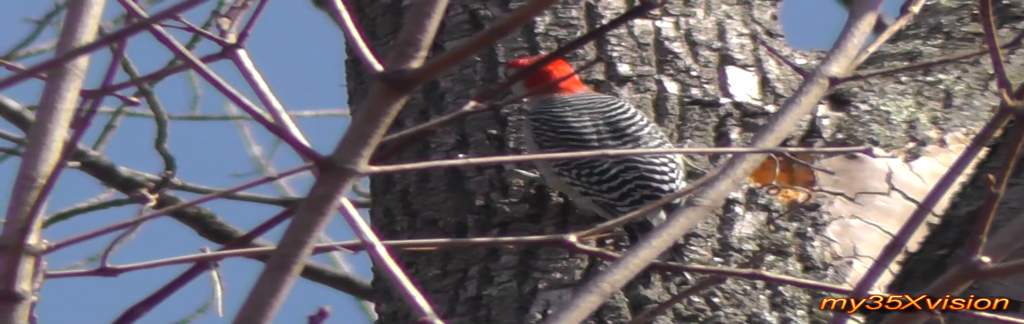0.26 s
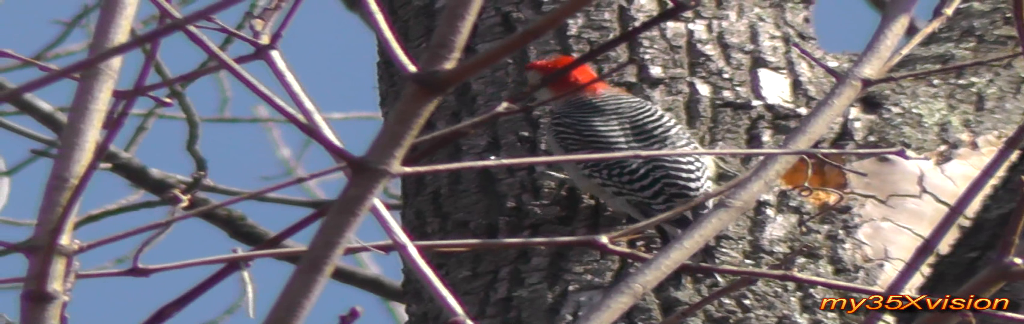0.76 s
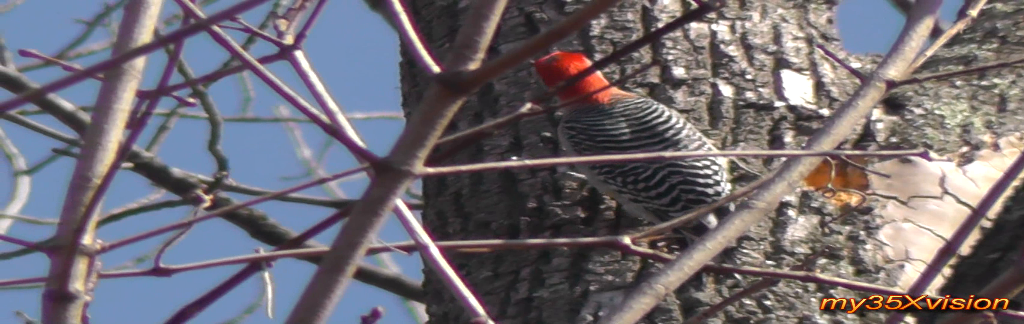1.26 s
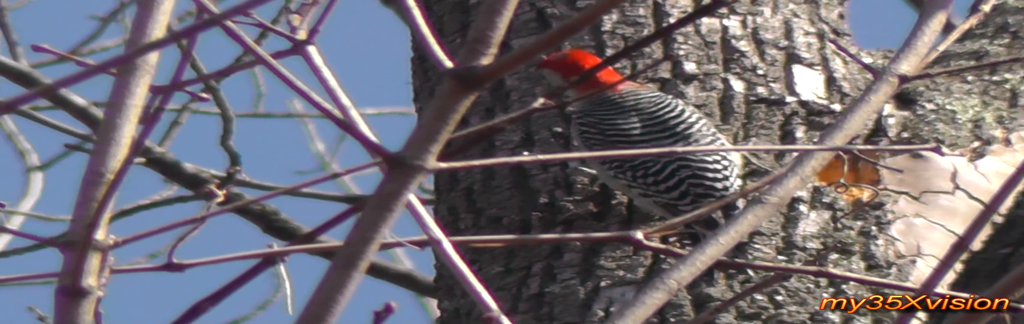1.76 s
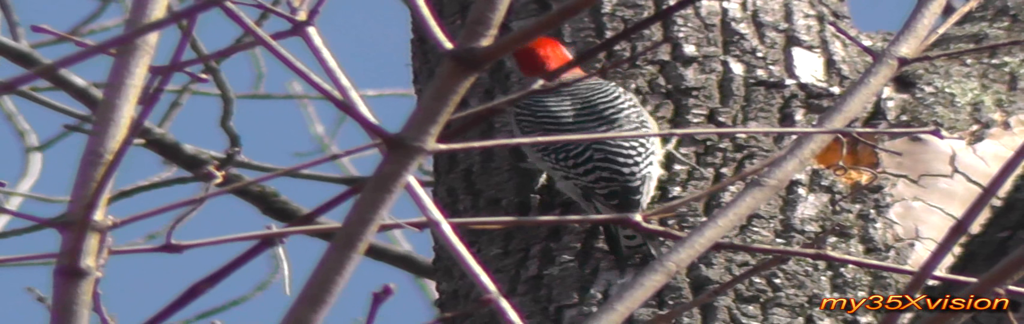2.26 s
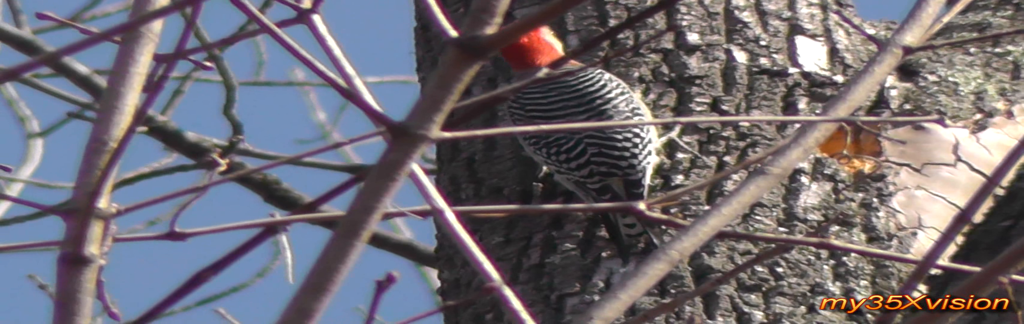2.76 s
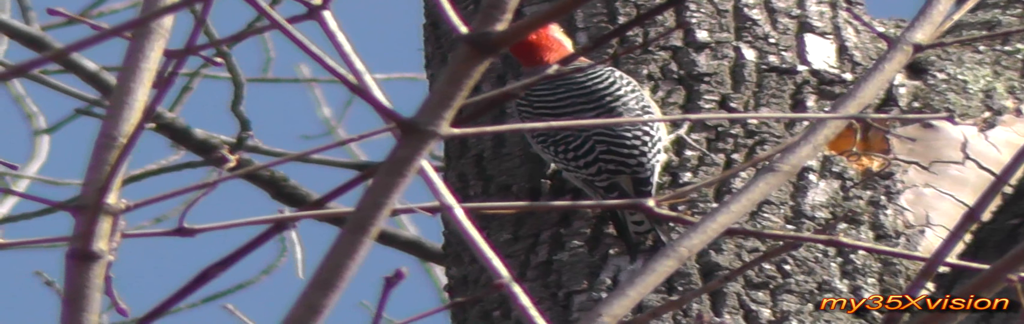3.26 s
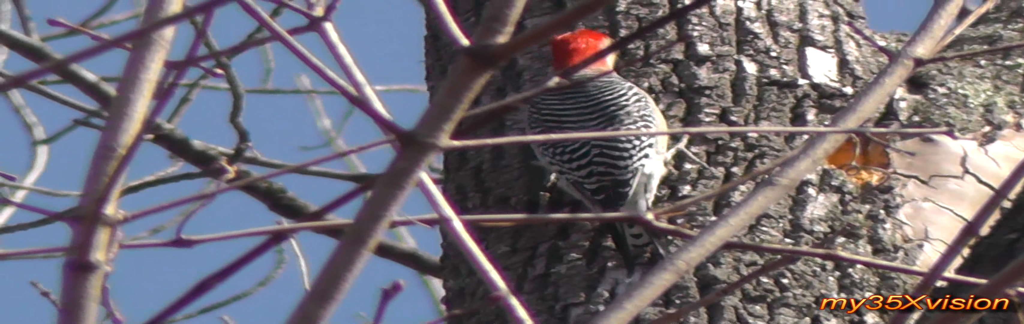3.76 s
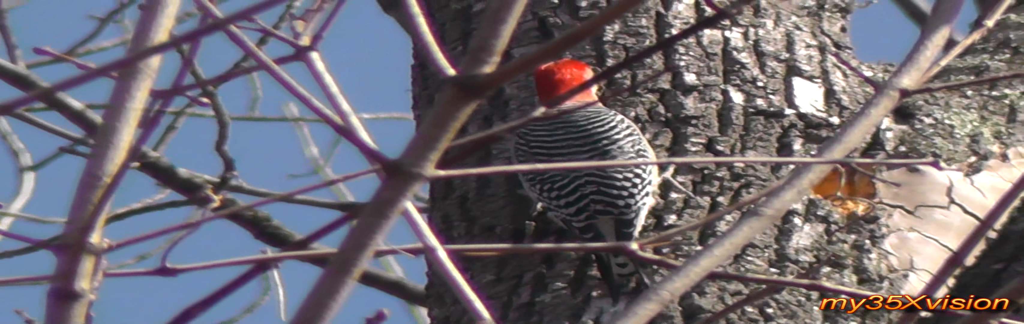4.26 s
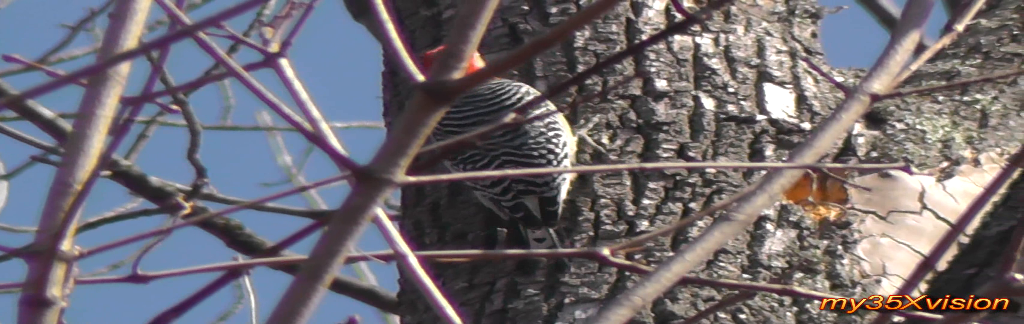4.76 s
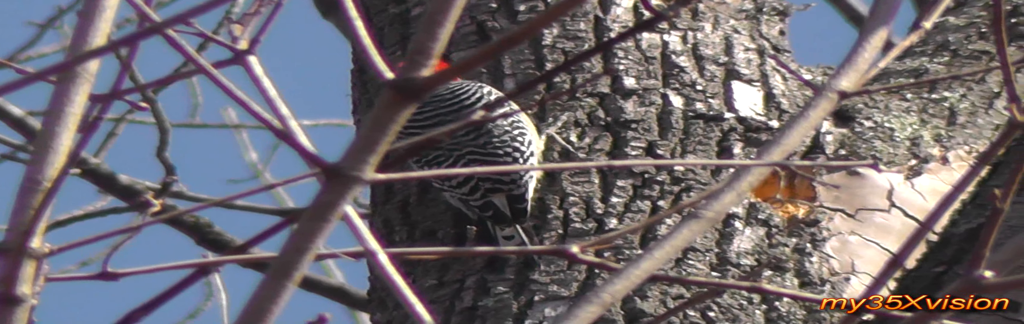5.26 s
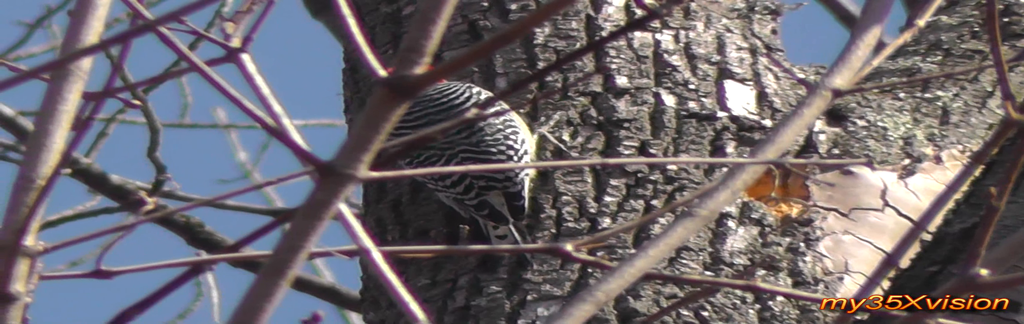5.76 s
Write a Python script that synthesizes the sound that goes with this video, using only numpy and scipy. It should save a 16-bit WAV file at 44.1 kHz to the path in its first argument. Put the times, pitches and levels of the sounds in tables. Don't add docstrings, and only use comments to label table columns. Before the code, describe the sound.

Four brief churring woodpecker calls ring among park trees with long gaps, above a soft far-off road rumble, unsteady hum and tiny twig ticks.

```python
import sys
import numpy as np
from scipy import signal
from scipy.fft import rfft, irfft, next_fast_len
from scipy.io import wavfile
from scipy.ndimage import uniform_filter1d, map_coordinates

SR = 44100
rng = np.random.default_rng(int(sys.argv[2]) if len(sys.argv) > 2 else 0)


def unload_wav(signal):
    wavfile.write(
        sys.argv[1],
        SR,
        np.round(np.clip(np.atleast_2d(signal).T, -1, 1) * 32767).astype(np.int16),
    )


def makeup_ratio(level_db):
    decades = np.asarray(level_db, float) / 20
    return 10 ** decades


N = 264820
TOP_HZ = 15770


def unit(x):
    return x / np.sqrt(np.mean(x ** 2) + 1e-20)


def along(points, hz):
    f, v = np.transpose(points)
    return np.interp(np.log(hz + 1), np.log(f + 1), v)


def wobble(rate, size):
    knots = rng.standard_normal(int(size * rate / SR) + 4)
    return map_coordinates(knots, [np.arange(size) * rate / SR])


def filtered(x, response):
    size = next_fast_len(x.shape[-1] + 8192)
    spectrum = rfft(x, size) * response(np.fft.rfftfreq(size, 1 / SR))
    return irfft(spectrum, size)[..., :x.shape[-1]]


def causal(points):
    def response(hz):
        cepstrum = irfft(np.log(makeup_ratio(along(points, hz)) + 1e-6))
        half = len(cepstrum) // 2
        cepstrum[1:half] *= 2
        cepstrum[half + 1:] = 0
        return np.exp(rfft(cepstrum))
    return response


# (frequency [Hz], likeness [0 to 1])
LIKENESS = [(30, 1), (60, 0.98), (130, 1.0), (290, .98), (640, 0.77), (1410, 0.65), (3100, 0.92),
            (4500, 0.87), (6820, 0.89), (15000, 0.18)]


def rush(spectrum, patchy_db):
    noise = signal.stft(rng.standard_normal((2, N)), nperseg=512)[2]
    patches = uniform_filter1d(rng.standard_normal(noise.shape[1:]), size=6, axis=0)
    patches = uniform_filter1d(patches, size=14, axis=1)
    pair = signal.istft(noise * makeup_ratio(patchy_db * unit(patches)), nperseg=512)[1][:, :N]

    def colour_and_width(hz):
        angle = np.arccos(np.clip(along(LIKENESS, hz), -1, 1)) / 2
        return makeup_ratio(along(spectrum, hz)) * [np.cos(angle), np.sin(angle)]

    mid, side = filtered(pair, colour_and_width)
    return unit(np.array([mid + side, mid - side]))


# (frequency [Hz], level [dB])
RUMBLE_COLOUR = [(13, -67), (26, -33), (40, -16), (50, -20), (67, -5), (118, -3), (146, -2.5), (177, 0),
                 (227, -1), (261, -11.5), (295, -2.5), (323, -13), (808, -18), (1500, -27), (1950, -48),
                 (3300, -120)]


def traffic():
    t = np.arange(N) / SR
    level_db = -38 + 0.18 * t + 0.17 * wobble(2.94, N)
    return makeup_ratio(level_db) * rush(RUMBLE_COLOUR, patchy_db=0.45)


# (frequency [Hz], level [dB])
HISS_COLOUR = [(880, -8.5), (1500, -24), (1610, -2), (2120, -12), (2520, 0), (2680, 2), (3070, -3),
               (3890, -20.5), (4380, -18), (5220, -12), (5600, -13), (6680, -5), (7370, -18), (15200, -21),
               (15700, -25)]


def camera_hiss():
    return makeup_ratio(-57.5 + 3.0) * rush(HISS_COLOUR, patchy_db=1.5)


# (frequency [Hz], pitch wander [Hz], level [dB])
MOTOR_TONES = [(178, 8.05, -46), (295.4, 5.14, -57)]


def motor():
    hum = np.zeros(N)
    for hz, wander_hz, db in MOTOR_TONES:
        gain = makeup_ratio(db + 2.16 * wobble(9, N)) * np.sqrt(2)
        phase = 2 * np.pi * np.cumsum(hz + wander_hz * wobble(15, N)) / SR
        hum += gain * np.sin(phase)
    return hum


# (time [s], peak level [dB], ring frequency [Hz])
TWIG_TICKS = [
    (3.5555, -34, 3220),
    (3.591, -44, 6000),
    (3.5927, -41, 2800),
    (5.3976, -39, 6050),
    (5.399, -43, 3000),
]


def twigs():
    out, t = np.zeros(N + SR), np.arange(SR // 20) / SR
    for start, db, hz in TWIG_TICKS:
        ring = np.sin(2 * np.pi * hz * t) * makeup_ratio(-60 * t / 0.0064)
        crackle = 0.99 * rng.standard_normal(len(t)) * makeup_ratio(-60 * t / 0.01)
        soft_start = 1 - np.exp(-t / 0.00044)
        out[round(start * SR):][:len(t)] += makeup_ratio(db) * (ring + crackle) * soft_start
    return filtered(out[:N], causal([(1200, -39), (2600, 7.5), (8000, 2.5), (11000, -12), (16000, -18)]))


# (frequency [Hz], time to fall by 60 dB [s])
TREE_DECAY = [(800, 0.97), (2000, 1), (7000, 0.99), (10000, 0.69)]
# (delay [s], level [dB])
TRUNK_ECHOES = [(.0025, -18), (.008, -11), (.014, -12.5), (.023, -19)]


def trees(x):
    hz, t, noise = signal.stft(rng.standard_normal((2, SR)), SR, nperseg=256)
    slow_decay = makeup_ratio(-60 * t / along(TREE_DECAY, hz)[:, None])
    fast_decay = 0.88 * makeup_ratio(-60 * t / 0.21)
    tail = signal.istft(noise * (slow_decay + fast_decay), SR, nperseg=256)[1]
    tail += 0.97 * tail.mean(axis=0)
    tail = makeup_ratio(-12.0) * tail / np.linalg.norm(tail[0])
    for delay, db in TRUNK_ECHOES:
        tail[0, round(delay * SR)] += makeup_ratio(db)
        tail[1, round(delay * SR) + rng.integers(-2, 3)] += makeup_ratio(db)
    return signal.fftconvolve(x[None], tail, axes=1)[:, :len(x)]


# (frequency [Hz], level [dB])
BEAK_COLOUR = [(1470, -41), (2500, -3.5), (3600, -3), (4250, -14.5), (4580, -6), (5600, -7), (7200, -2),
               (7660, -5.5), (8250, -23), (10300, -43.5), (13400, -72), (22000, -120)]


def facing(lobes):
    hz = np.geomspace(BEAK_COLOUR[0][0], BEAK_COLOUR[-1][0], 300)
    peaks_db = sum(db * np.exp(-((hz - centre) / width) ** 2) for centre, width, db in lobes)
    return np.transpose([hz, along(BEAK_COLOUR, hz) + peaks_db])


LEAP_S, LAST_LONGER_S = .0285, 0.00506
BEAK_OPENS_S, BEAK_SHUTS_S, SHUT_DB = 0.026, 0.022, -11.5
TIRES_DB_PER_S, ONSET_BRIGHT_DB = -11, -1.5
TURN_S = 0.098


def beak_opening(start, leaps, beak_db, bright_db, turn_db, t):
    end = leaps[-1, 0] + LEAP_S + LAST_LONGER_S
    opening = 1 - (t - start) / BEAK_OPENS_S
    shutting = 1 - (end - t) / BEAK_SHUTS_S
    shut = np.clip(np.maximum(opening, shutting), 0, 1)
    tired_db = TIRES_DB_PER_S * (t - (start + end) / 2)
    lower_db = beak_db + tired_db + SHUT_DB * shut - 120 * (t > end)
    upper_db = lower_db + bright_db + ONSET_BRIGHT_DB * (t < leaps[0, 0])
    turned_db = turn_db * np.clip(2 * (1 - (end - t) / TURN_S), 0, 1)
    return uniform_filter1d(makeup_ratio(np.array([lower_db, upper_db, turned_db])), size=200, axis=1)


REST_HZ, PEAK_HZ, FIRST_SHORT_HZ = 1040.4, 1907, 150
FULL_DB, SAG_HZ_PER_DB, SAG_MOST_HZ = -31, 130, 398
SECOND_HZ, SECOND_SCATTER, PEAK_SCATTER = 1361, 0.059, 0.01938
HOARSE, FIRST_HOARSE, HOARSE_SCATTER = .63, .4, .1
KICK_DB = 3.5


def syrinx_controls(onset, leaps, t):
    onset_s, onset_hz, onset_db = np.transpose(onset)
    pitch = np.interp(t, onset_s, onset_hz)
    level = np.interp(t, onset_s, onset_db, left=-120)
    second, hoarse = pitch.copy(), np.zeros(len(t))
    chance = rng.standard_normal((len(leaps), 3))
    for k, ((start, leap_db), (top_luck, second_luck, rough_luck)) in enumerate(zip(leaps, chance)):
        last = k == len(leaps) - 1
        end = start + LEAP_S + LAST_LONGER_S * last
        lower = SECOND_HZ * (1 + SECOND_SCATTER * second_luck)
        sag = np.clip(SAG_HZ_PER_DB * (FULL_DB - leap_db), 0, SAG_MOST_HZ) + FIRST_SHORT_HZ * (k == 0)
        top = PEAK_HZ * (1 + PEAK_SCATTER * top_luck) - sag
        rough = (HOARSE if k and not last else FIRST_HOARSE) + HOARSE_SCATTER * rough_luck
        u = np.clip((t - start) / (end - start), 0, 1)
        arch = np.abs(np.sin(np.pi * np.clip(1.09 * u, 0, 1) ** 1.05)) ** .68
        now = t > start - .003
        rest = REST_HZ - 3000 * np.clip(t - end, 0, .02)
        pitch[now] = (rest + (top - rest) * arch)[now]
        second[now] = np.minimum(pitch, lower * (.94 + 0.101 * u))[now]
        level[now] = (leap_db - 0.9 - 1.9 * (1 - arch) + KICK_DB * (.5 - u))[now]
        level -= min(6 * k, 18) * np.exp(-((t - start + 0.0025) / 0.0021) ** 2)
        hoarse[now] = np.clip(rough, 0, 1) * (0.23 + 0.91 * arch ** 3)[now]
    level -= 2600 * np.clip(t - end + 0.00075, 0, 1)
    return uniform_filter1d(np.array([pitch, second, level, hoarse]), size=90, axis=1)


# (frequency [Hz], level [dB])
THROAT_COLOUR = [(500, -64), (800, -8.5), (930, -1), (1050, -1), (1170, -1.5), (1330, 3), (1430, 3),
                 (1570, 3), (1670, -6.5), (1870, 0.5), (2100, -9.5), (2330, -22.5), (2600, -48)]
TURN_HZ, TURN_WIDTH_HZ = 5500, 490
GAP_HZ, GAP_WIDTH_HZ, GAP_DB = 3730, 580, -6


def call(onset, leaps, head, beak, size):
    t = onset[0][0] + np.arange(size) / SR
    pitch, second, level, hoarse = syrinx_controls(onset, leaps, t)

    def voice_phase(hz):
        waver = 1 + (.003 + .075 * hoarse) * wobble(450, size)
        return 2 * np.pi * np.cumsum(hz * waver) / SR

    phase = voice_phase(pitch)
    behind = voice_phase(second)
    pulses = sum(np.cos(k * phase) * (k * pitch < TOP_HZ) for k in range(1, 18))
    pulses *= 1 - .4 * hoarse + 1.1 * hoarse * np.cos(phase - behind)
    pulses += .15 * hoarse * np.cos(behind)
    strain = uniform_filter1d(hoarse, size=1500)
    leak = (.1 + 3.5 * strain) * rng.standard_normal(size) * (1 + np.cos(phase))
    flutter_db = 1.6 * wobble(200, size)
    low = filtered(makeup_ratio(level + flutter_db + 5.5) * (pulses + 0.22 * leak), causal(THROAT_COLOUR))

    high = pulses + filtered(leak, lambda hz: .5 + .5 / (1 + (4300 / (hz + 1)) ** 6))
    high = filtered(high, lambda hz: causal(head)(hz) / (1 + (hz / 11500) ** 16))
    lobe = filtered(high, lambda hz: np.exp(-((hz - TURN_HZ) / TURN_WIDTH_HZ) ** 2))
    gap = filtered(high, lambda hz: np.exp(-((hz - GAP_HZ) / GAP_WIDTH_HZ) ** 2))
    in_trill = np.clip((t - leaps[0, 0]) / .006, 0, 1)
    high = high + (makeup_ratio(GAP_DB) - 1) * in_trill * gap
    upper = filtered(high, lambda hz: 1 / (1 + (6000 / (hz + 1)) ** 12))
    lower_gain, upper_gain, turned = beak_opening(t[0], leaps, *beak, t)
    lower = high - upper + (turned - 1) * lobe
    return low + makeup_ratio(2.5) * lower_gain * lower + makeup_ratio(2.0) * upper_gain * upper


# (time [s], onset level [dB], beak opening [dB], brightness above 6 kHz [dB],
# gain as the head turns to the camera [dB])
CALLS = [
    (-.034, -43, -49, 2.5, 7),
    (1.016, -42, -47, 2.5, 0),
    (2.157, -41.5, -44.5, -3, 9),
    (3.934, -41.5, -44, 1.5, 5.5),
]
# (time after start [s], pitch [Hz], level [dB])
CLEAR_ONSET = [
    (0, 618, -14),
    (.005, 688, -1.5),
    (.015, 852, 5.5),
    (.023, 973, 3),
    (.029, 1010, 2),
    (.044, 908, 1),
    (.052, 989, 4.5),
]
# (time [s], level [dB])
TRILL_LEAPS = [(.022, -32.5), (.057, -29.5), (.099, -29), (.139, -28.5), (.178, -28), (.216, -30.5),
               (.25, -31.5), (1.072, -29.5), (1.103, -28), (1.143, -28.5), (1.182, -28), (1.219, -27.5),
               (1.255, -28.5), (1.295, -30.5), (1.326, -33.5), (2.208, -30), (2.244, -27.5), (2.281, -28),
               (2.318, -29.5), (2.356, -29), (2.395, -32.5), (2.432, -32), (2.471, -39), (3.989, -29.5),
               (4.022, -28.5), (4.061, -29), (4.101, -27.5), (4.14, -29.5), (4.176, -28), (4.215, -32.5)]
# (frequency [Hz], width [Hz], level [dB])
HEAD_ANGLES = [
    [(2770, 350, 3), (5200, 500, -8), (6000, 330, 3), (9340, 1000, 18)],
    [(3150, 730, 1), (3884, 405, -0.5), (5430, 280, 6.5), (9200, 700, 4)],
    [(3520, 870, -5), (5310, 300, 1), (7510, 270, 4.5), (9200, 840, 12)],
    [(2800, 73, 4.5), (4777, 275, 7), (6880, 335, 5), (10530, 860, 22.5)],
]
# (frequency [Hz], left minus right level [dB])
SIDE_LEAN = [(60, -0.5), (180, -0.5), (550, -7), (1650, 2), (4970, 1), (15000, -2)]


def woodpecker():
    out, leaps = np.zeros((2, N + 3 * SR)), np.array(TRILL_LEAPS)
    for (start, db, *beak), lobes in zip(CALLS, HEAD_ANGLES):
        own = leaps[(leaps[:, 0] > start) & (leaps[:, 0] < start + .5)]
        onset = np.array(CLEAR_ONSET) + [start, 0, db]
        voice = call(onset, own, facing(lobes), beak, size=SR // 2)
        voice = np.pad(voice, (0, SR))
        both = np.array([voice, voice])
        direct = filtered(both, lambda hz: makeup_ratio(np.outer([.5, -.5], along(SIDE_LEAN, hz))))
        out[:, SR + round(start * SR):][:, :len(voice)] += direct + trees(voice)
    return out[:, SR:SR + N]


def scene():
    background = traffic() + camera_hiss() + motor()
    return woodpecker() + twigs() + background


def band_limit(x):
    return signal.sosfilt(signal.butter(12, 16330, fs=SR, output="sos"), x)


def record(dry):
    mix = filtered(dry, lambda hz: hz < TOP_HZ)
    return band_limit(mix)


dry = scene()
out = record(dry)
unload_wav(out)
```